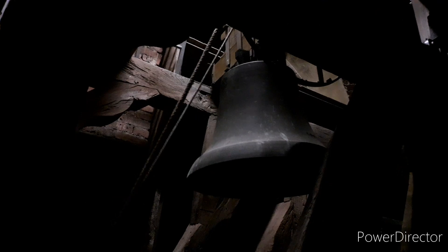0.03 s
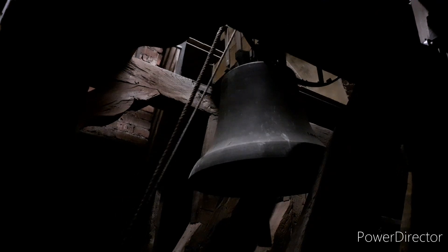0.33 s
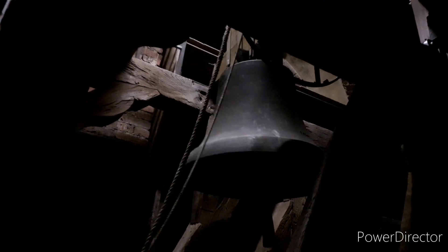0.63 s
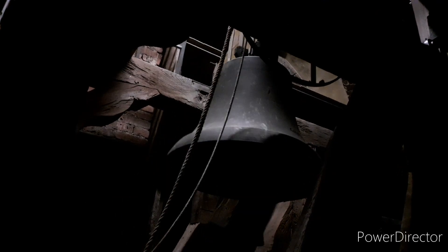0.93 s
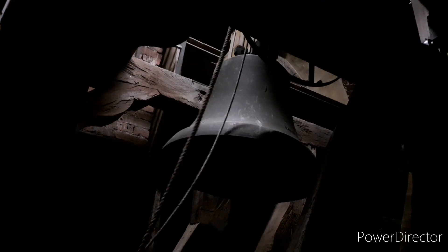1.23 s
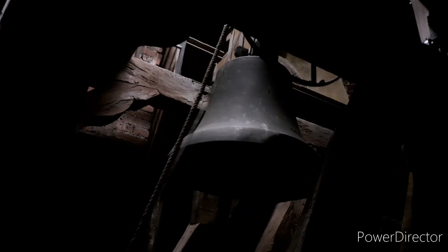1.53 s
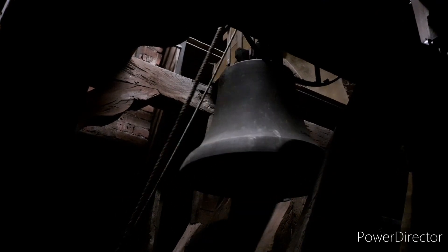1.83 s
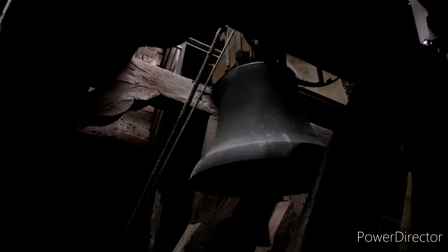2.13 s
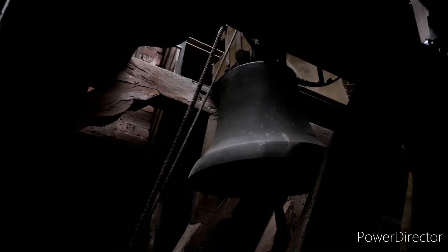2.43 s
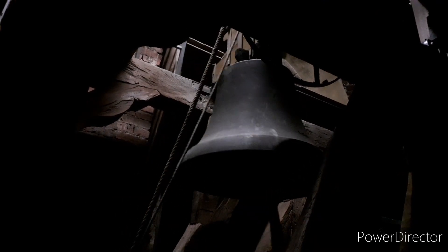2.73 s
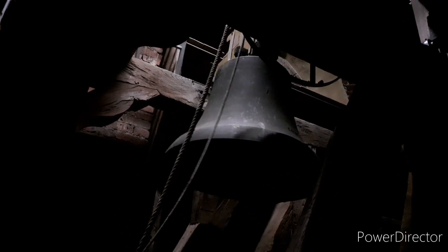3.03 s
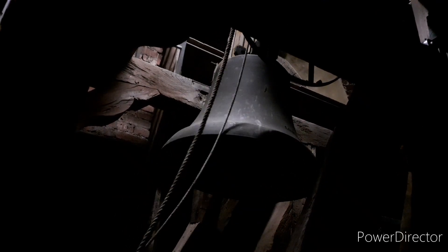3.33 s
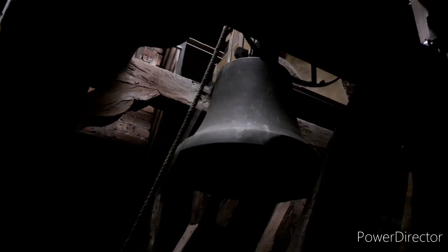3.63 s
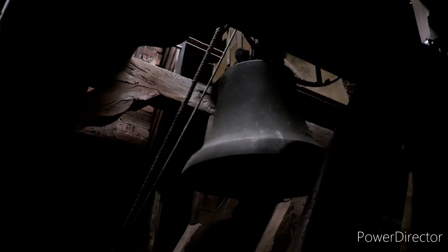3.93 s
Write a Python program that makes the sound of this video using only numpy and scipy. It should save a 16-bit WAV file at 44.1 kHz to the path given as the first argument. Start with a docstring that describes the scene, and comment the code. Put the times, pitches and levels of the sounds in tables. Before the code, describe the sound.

Two strikes of a big swinging bell, preceded by dull timber knocks and creaks.

```python
"""A large church bell swings in a timber belfry. The frame rumbles and shudders, the yoke knocks and
creaks, and the rope hisses as it is pulled; then the clapper strikes twice. The partials reach the
listener by many paths from the moving bell, so they flutter, faster the higher they are, and grow
calm at each turn of the swing."""
import sys
import numpy as np
from scipy import signal
from scipy.io import wavfile
from scipy.ndimage import uniform_filter1d

SR = 44100
rng = np.random.default_rng(int(sys.argv[2]) if len(sys.argv) > 2 else 0)


def file_out(sig):
    """Save sig as 16-bit WAV at sys.argv[1]."""
    # one column per channel
    cols = np.atleast_2d(sig).T
    # limit, then scale
    lim = np.clip(cols, -1, 1)
    pcm = np.round(lim * 32767).astype(np.int16)
    wavfile.write(sys.argv[1], SR, pcm)


N = 176400
T = np.arange(N) / SR
STEP = 40  # samples per envelope point
SLOW_T = T[::STEP]


def from_db(db):
    """Decibels to gain."""
    return 10 ** (np.asarray(db) / 20)


def unit_rms(x):
    """Scale to unit power."""
    return x / np.sqrt(np.mean(abs(x) ** 2) + 1e-20)


def at_hz(points, hz):
    """Read a spectrum on a log-frequency axis."""
    freqs, values = np.transpose(points)
    return np.interp(np.log(hz), np.log(freqs), values)


def envelope(age_s, rise_s, t60_s, hold_s=0):
    """Linear rise; exponential fall from age hold_s."""
    rise = np.clip(age_s / rise_s, 0, 1)
    return rise * np.exp(-np.log(1000) * np.maximum(age_s - hold_s, 0) / t60_s)


# Left-right likeness of the noises: (frequency [Hz], correlation [-])
STEREO_CORRELATION = [(300, 0.42), (1200, 0)]

def noise_bands():
    """Half-octave bands of stereo noise: (centre [Hz], samples)."""
    edges_hz = 22 * 2 ** (np.arange(20) / 2)
    white = rng.standard_normal((2, 2, N))
    bands = []
    for k, (low, high) in enumerate(zip(edges_hz, edges_hz[1:])):
        bandpass = signal.butter(2, [low, high], "band", fs=SR, output="sos")
        mid, side = signal.sosfilt(bandpass, white[k % 2])
        hz = np.sqrt(low * high)
        alike = at_hz(STEREO_CORRELATION, hz)
        bands.append((hz, np.sqrt(1 + alike) * mid + np.sqrt(1 - alike) * side * [[1], [-1]]))
    return bands


def coloured(bands, spectrum):
    """Unit-power noise with the given spectral shape."""
    return unit_rms(sum(from_db(at_hz(spectrum, hz)) * band for hz, band in bands))


# Tower air: (frequency [Hz], relative density [dB])
AIR_SPECTRUM = [(110, -19.5), (300, -7), (4000, -38.5), (15000, -49.5)]

def tower_air(bands, level_db=-48):
    """Still air: a faint, steady noise floor."""
    return from_db(level_db) * coloured(bands, AIR_SPECTRUM)


# Rumble envelope: (time [s], level [dB])
RUMBLE_LEVEL = [(0, -38), (.57, -43), (.61, -35), (.8, -34.5), (1.2, -41.5), (1.64, -46), (2.3, -47),
                (4, -60)]
# Rumble: (frequency [Hz], relative density [dB])
RUMBLE_SPECTRUM = [(25, -21.5), (50, 0), (100, 5), (300, -12), (600, -47)]

def frame_rumble(bands):
    """The timber rumbles under the swinging weight."""
    gain = from_db(np.interp(T, *np.transpose(RUMBLE_LEVEL)))
    return gain * coloured(bands, RUMBLE_SPECTRUM)


# Rope slides: (start [s], length [s], rise [s], level [dB])
ROPE_SLIDES = [(0.56, 0.37, 0.0066, -54.5), (0.981, 0.017, 0.046, -44), (1.514, 0.41, 0.25, -47.5)]
# Rope hiss: (frequency [Hz], relative density [dB])
ROPE_SPECTRUM = [(800, 13), (2500, -2), (7000, 0.5), (11000, -11), (15500, 0.5)]
# Ticks of the fittings: (time [s], level [dB])
TICKS, TICK_T60_S = [(0.061, -53.5), (0.285, -52.5), (1.492, -50.5)], 0.18

def rope(bands):
    """The rope hisses as it slides; its fittings tick."""
    slides = sum(from_db(db) * envelope(T - start_s, rise_s, t60_s=0.78, hold_s=length_s)
                 for start_s, length_s, rise_s, db in ROPE_SLIDES)
    ticks = sum(from_db(db) * envelope(T - start_s, 1 / SR, TICK_T60_S) for start_s, db in TICKS)
    return (slides + ticks) * coloured(bands, ROPE_SPECTRUM)


def bursts(rows):
    """Gain of abrupt, briefly held bursts."""
    return sum(from_db(db) * envelope(T - start_s, rise_s=0.0016, t60_s=0.19, hold_s=length_s)
               for start_s, length_s, db in rows)


# Frame shudders: (start [s], length [s], level [dB])
SHUDDERS = [(0.063, 0.057, -30.5), (0.232, 0.015, -30), (0.303, 0.09, -30.5), (0.584, 0.17, -34),
            (0.867, 0.063, -28.5), (1.044, 0.049, -25), (1.16, 0.071, -32), (1.438, 0.053, -30.5),
            (1.739, 0.03, -26.5), (1.852, 0.096, -35), (2.112, 0.034, -35), (3.409, 0.051, -42)]
# Frame response: (frequency [Hz], relative density [dB])
TIMBER_SPECTRUM = [(30, -5), (120, 12.5), (200, -0.5), (330, 4.5), (600, -34.5), (3000, -57.5)]

def frame_shudders(bands, levelling_s=0.027):
    """The timber shudders in short, dull bursts."""
    wood = coloured(bands, TIMBER_SPECTRUM)
    running_rms = np.sqrt(uniform_filter1d(np.mean(wood ** 2, 0), int(levelling_s * SR)))
    return wood / running_rms * bursts(SHUDDERS)


# Yoke knocks: (start [s], peak [dB], pitch [Hz], rise [s])
KNOCKS = [(0.175, -20, 104, 0.0056), (0.344, -22.5, 323, 0.0065), (0.849, -22.5, 121, 0.013),
          (1.057, -23.5, 324, 0.02), (1.718, -24.5, 88, 0.0049), (1.801, -18, 107, 0.0093)]

def yoke_knocks():
    """The yoke knocks hollowly, a few cycles at a time."""
    knocks = 0
    for start_s, db, hz, rise_s in KNOCKS:
        age_s = np.maximum(T - start_s, 0)
        pulse = (age_s / rise_s * np.exp(1 - age_s / rise_s)) ** 2
        knocks += from_db(db) * pulse * np.sin(2 * np.pi * hz * age_s)
    return knocks


def crackle(slips_per_s=500, slip_s=0.00099):
    """Unit-power gain made of tiny, uneven slips, each dying at once."""
    slips = (rng.random(N) < slips_per_s / SR) * rng.random(N)
    pole = np.exp(-1 / (slip_s * SR))
    return unit_rms(signal.lfilter([1], [1, -2 * pole, pole * pole], slips + 1e-18))


# Bearing creaks: (start [s], length [s], level [dB])
CREAKS = [(0.582, 0.093, -36.5), (1.028, 0.064, -34), (1.673, 0.0087, -41)]
# Creak: (frequency [Hz], relative density [dB])
CREAK_SPECTRUM = [(150, -18), (400, 9.5), (1500, -15.5), (8000, -35.5)]

def bearing_creaks(bands):
    """The yoke creaks in its bearings in runs of tiny slips."""
    return bursts(CREAKS) * crackle() * coloured(bands, CREAK_SPECTRUM)


# Clapper blows: (time [s], clang level [dB])
STRIKES = [(2.182, -14), (2.877, -16)]
# Clang before low-pass: (frequency [Hz], relative density [dB])
CLANG_SPECTRUM = [(100, -22.5), (280, -3), (550, 6), (1000, 2.5), (2400, 1.5), (7000, -30)]

def clapper_clang(bands, rise_s=0.0028, top_hz=7000, tail_db=-13.5, tail_top_hz=1890):
    """The clapper's gritty crash echoes round the belfry and leaves a dull tail."""
    crash = sum(from_db(db) * envelope(T - start_s, rise_s, t60_s=0.23) for start_s, db in STRIKES)
    tail = sum(from_db(db + tail_db) * envelope(T - start_s, rise_s, t60_s=1.15)
               for start_s, db in STRIKES)
    lowpass = signal.butter(4, top_hz, fs=SR, output="sos")
    bright = signal.sosfilt(lowpass, coloured(bands, CLANG_SPECTRUM))
    dull = signal.lfilter(*signal.butter(2, tail_top_hz, fs=SR), bright)
    grit = (1 + crackle()) / 2
    return crash * grit * bright + tail * dull


SWING_PERIOD_S, TURN_S, SWING_M = 2.04, 2.8, 0.744
SOUND_M_PER_S, MEAN_DELAY_S = 343, 0.022

def reflections(hz, start_s, paths):
    """Complex gain of many paths, each delayed and Doppler-shifted by the swing."""
    position_m = SWING_M * np.cos(2 * np.pi * (SLOW_T - TURN_S) / SWING_PERIOD_S)
    phase, aim, lateness = rng.random((3, paths, 1))
    direction_cos = 2 * (np.arange(paths)[:, None] + aim) / paths - 1
    delay_s = -MEAN_DELAY_S * np.log(1 - lateness)
    arrived = np.clip((SLOW_T - start_s - delay_s + delay_s.min()) * SR / STEP / 2, 0, 1)
    doppler_cycles = direction_cos * position_m * hz / SOUND_M_PER_S
    return (arrived * np.exp(2j * np.pi * (phase + doppler_cycles))).sum(0)


TWIN_DB, TWIN_MAX_SPLIT = -4.5, 0.005  # bell not quite round: each mode has a detuned twin
SCATTER_DB, SCATTER_WIDTH_HZ, SCATTER_T60_S = -9, 30, 4.3  # level and decay relative to the partial

def ringing(hz, start_s, t60_s, paths=12):
    """Mid and side envelopes of a struck partial: twin beat, path flutter, scattered sound."""
    detune, phase = 2 * rng.random(2) - 1
    beat_hz = detune * TWIN_MAX_SPLIT * hz
    beat = 1 + from_db(TWIN_DB) * np.exp(2j * np.pi * (phase + beat_hz * SLOW_T))
    fall = envelope(SLOW_T - start_s, STEP / SR, t60_s)
    white = rng.standard_normal((2, len(SLOW_T), 2)) @ [1, 1j]
    scatter_gain = from_db(SCATTER_DB) * envelope(SLOW_T - start_s, STEP / SR, SCATTER_T60_S)
    mid_side = []
    for scatter in signal.lfilter(*signal.butter(2, SCATTER_WIDTH_HZ, fs=SR / STEP), white):
        flutter = unit_rms(beat * reflections(hz, start_s, paths))
        mid_side.append(unit_rms(fall * (flutter + scatter_gain * unit_rms(scatter))))
    return np.array(mid_side) * np.sqrt(np.mean(fall ** 2))


def struck_twice(hz, first_db, second_db, t60_s):
    """Each blow adds to what still rings."""
    return sum(from_db(db) * ringing(hz, start_s, t60_s)
               for (start_s, _), db in zip(STRIKES, (first_db, second_db)))


def stereo_sines(pitches_hz, envelopes, side_db):
    """Sum of sines on complex mid and side envelopes, interpolated in blocks of STEP samples."""
    spin = 2j * np.pi * np.array(pitches_hz)[:, None]
    envelopes = np.array(envelopes)
    block_start, in_block = np.exp(spin * SLOW_T)[:, None], np.exp(spin * T[:STEP])
    slopes = np.diff(envelopes, append=envelopes[..., -1:])
    held = np.tensordot(envelopes * block_start, in_block, (0, 0))
    ramped = np.tensordot(slopes * block_start, in_block * np.arange(STEP) / STEP, (0, 0))
    mid, side = np.sqrt(2) * (held + ramped).real.reshape(2, N)
    return mid + from_db(side_db) * side * [[1], [-1]]


def swell(curve, roundness=1.42):
    """Gain in round arches between narrow dips."""
    times_s, db = np.transpose(curve)
    arches = np.interp(SLOW_T, times_s, from_db(db) ** roundness) ** (1 / roundness)
    return uniform_filter1d(arches, size=24)


# Hum, prime, tierce, nominal: (pitch [Hz], blow 1 echo [dB], blow 2 echo [dB], T60 [s])
LOW_PARTIALS = [(275.4, -41.5, -48.5, 11), (540.5, -33.5, -35, 5.7), (671.9, -27, -28.5, 19),
                (1146, -16.5, -16.5, 2.7)]
# Direct tone of each: (time [s], level [dB])
HUM_LEVEL = [(2.25, -29.5), (2.46, -59), (2.62, -25.5), (3.059, -35), (3.231, -32), (3.6, -69),
             (3.82, -38.5), (3.96, -44)]
PRIME_LEVEL = [(2.22, -45), (2.44, -23.5), (2.62, -30), (2.86, -21), (3.08, -17), (3.46, -40), (3.62, -25),
               (3.75, -36.5), (3.85, -26.5)]
TIERCE_LEVEL = [(2.24, -14.5), (2.411, -26), (2.63, -22), (2.74, -36.5), (2.84, -58), (3.101, -28),
                (3.25, -58.5), (3.42, -21.5), (3.558, -42.5), (3.78, -24), (3.96, -38.5)]
NOMINAL_LEVEL = [(2.32, -19), (2.38, -42), (2.424, -23), (2.52, -32.5), (2.87, -34), (2.92, -23),
                 (3.121, -26.5), (3.201, -61), (3.3, -23), (3.451, -34.5), (3.899, -50)]

def low_partials(rise_s=0.015):
    """Direct tones swell and fade as the mouth turns; their echoes linger at the sides."""
    onset = np.clip((SLOW_T - STRIKES[0][0]) / rise_s, 0, 1)
    rings = []
    for partial, curve in zip(LOW_PARTIALS, (HUM_LEVEL, PRIME_LEVEL, TIERCE_LEVEL, NOMINAL_LEVEL)):
        _, echo = struck_twice(*partial)
        rings.append([onset * swell(curve), echo])
    return stereo_sines([hz for hz, *_ in LOW_PARTIALS], rings, side_db=0)


def diffuse_sines(pitches_hz, rings, side_db=1.5):
    """Wide stereo sines, scaled to offset the added side power."""
    return stereo_sines(pitches_hz, rings, side_db) / np.hypot(1, from_db(side_db))


# Upper bell modes: (pitch [Hz], blow 1 level [dB], blow 2 level [dB], T60 [s])
UPPER_PARTIALS = [(831.3, -40, -43, 10.5), (1459.4, -26, -21, 1.74), (1514.4, -25.5, -30, 2.7),
                  (1708, -23.5, -39.5, 1.6), (1727.6, -23, -24, 6.8), (1809.5, -27, -31.5, 2.8),
                  (2282, -31.5, -36, 1.5), (2393.4, -20, -22, 3.88), (2446, -33, -35.5, 3.95),
                  (2659, -29, -27, 3.8), (3123, -22, -24, 2.32), (3904, -29, -29, 2.89),
                  (4708, -35, -35, 2.8), (5544, -33.5, -34.5, 1.5), (6392, -39, -37, 1.53),
                  (7260, -40.5, -40, 0.68), (8100, -49, -46.5, 1.3)]

def upper_partials():
    """The higher modes arrive from all round the belfry."""
    rings = [struck_twice(*partial) for partial in UPPER_PARTIALS]
    return diffuse_sines([hz for hz, *_ in UPPER_PARTIALS], rings)


# Overtone ceiling: (frequency [Hz], level per mode [dB])
OVERTONE_CEILING = [(1400, -43.5), (2500, -28.5), (4500, -35.5), (8000, -47), (15000, -55.5)]

def overtones(count=90, spread_db=14, t60_at_1khz_s=2.7):
    """A crowd of weak, short modes of uneven strength gives each blow its shimmer."""
    low, high = np.sqrt([OVERTONE_CEILING[0][0], OVERTONE_CEILING[-1][0]])
    spacing = (np.arange(count) + rng.random(count)) / count
    pitches_hz = (low + (high - low) * spacing) ** 2
    gains = from_db(at_hz(OVERTONE_CEILING, pitches_hz) - spread_db * (1 - rng.random(count)))
    t60s_s = t60_at_1khz_s * (pitches_hz / 1000) ** -0.75
    rings = [gain * sum(ringing(hz, start_s, t60_s, paths=4) for start_s, _ in STRIKES)
             for hz, gain, t60_s in zip(pitches_hz, gains, t60s_s)]
    return diffuse_sines(pitches_hz, rings)


def scene(right_over_left_db=1.5):
    """Bell, yoke, frame and rope over the tower's still air, slightly to the right."""
    bands_a, bands_b = noise_bands(), noise_bands()
    bell = low_partials() + upper_partials() + overtones() + clapper_clang(bands_a)
    frame = frame_rumble(bands_b) + frame_shudders(bands_a)
    yoke = yoke_knocks() + bearing_creaks(bands_b)
    pan = from_db([[-right_over_left_db / 2], [right_over_left_db / 2]])
    return pan * (bell + frame + yoke + rope(bands_a) + tower_air(bands_a))


def record(dry, cutoff_hz=15650):
    """Clip at full scale, then low-pass steeply."""
    lowpass = signal.ellip(12, 0.1, 90, cutoff_hz, fs=SR, output="sos")
    return signal.sosfilt(lowpass, np.clip(dry, -1, 1))


dry = scene()
out = record(dry)
file_out(out)
```